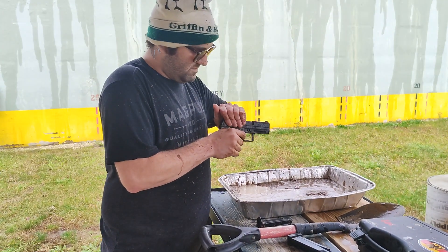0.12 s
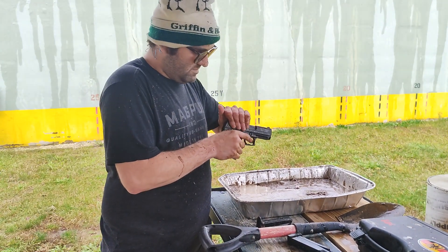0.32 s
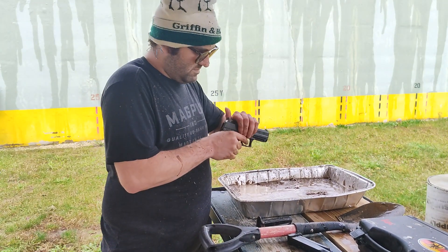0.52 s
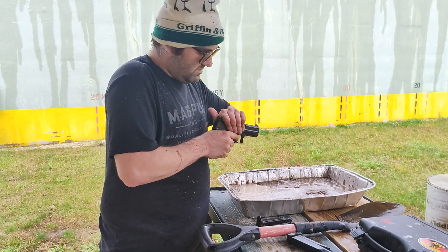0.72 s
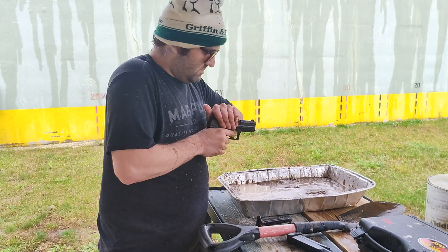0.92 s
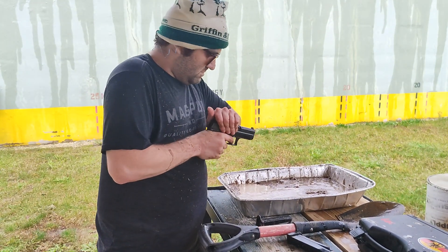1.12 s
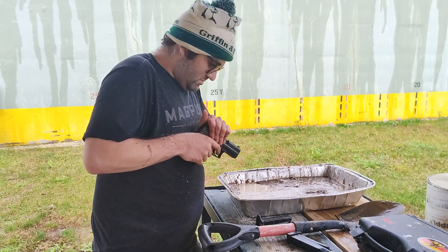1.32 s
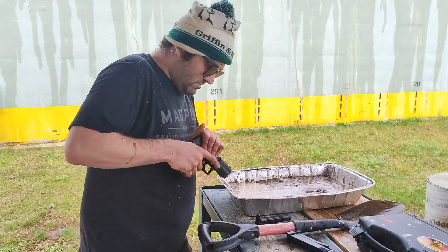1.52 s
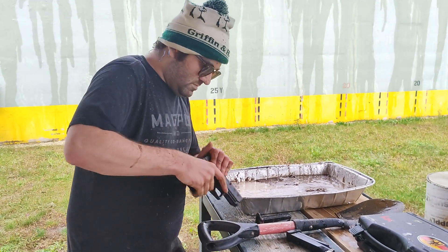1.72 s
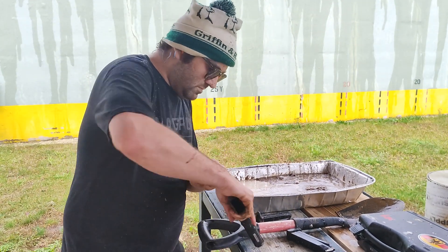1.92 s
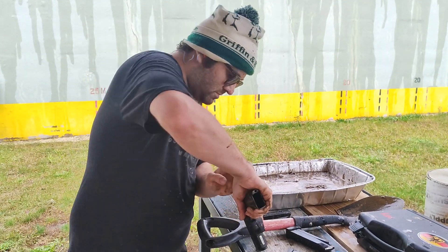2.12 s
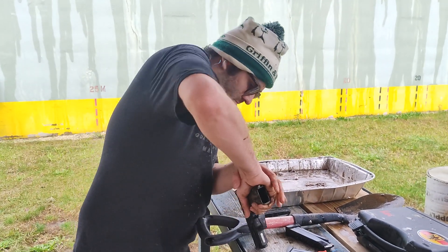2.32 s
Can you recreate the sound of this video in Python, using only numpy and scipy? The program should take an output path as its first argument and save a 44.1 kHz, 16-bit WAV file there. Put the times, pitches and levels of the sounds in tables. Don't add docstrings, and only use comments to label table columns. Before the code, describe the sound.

Close outdoor stereo pickup of a jammed pistol slide: tiny clicks, one loud bright clack early, fading metal rattles, quiet handling with cloth rub, a bird trill, then soft knocks of the muzzle on a light table.

```python
import sys
import numpy as np
from scipy import signal
from scipy.io import wavfile
from scipy.ndimage import uniform_filter1d

SR = 44100
rng = np.random.default_rng(int(sys.argv[2]) if len(sys.argv) > 2 else 0)


def digitize_waveform(pressure):
    field = np.atleast_2d(pressure).T
    bounded = np.clip(field, -1, 1)
    quanta = np.round(bounded * 32767).astype(np.int16)
    wavfile.write(sys.argv[1], SR, quanta)


def ratio(d):
    e = np.asarray(d, float) / 20
    return 10 ** e


N = 105840

# [t/s, level/dB]
BREEZE_LEVEL = [(0, -52.5), (.4, -53), (.75, -60.5), (1.3, -63), (1.5, -62.5), (2, -66.5), (2.4, -50)]
# [f/Hz, level/dB]
BREEZE_COLOUR = [(20, -28), (45, -2), (80, 9.5), (130, 4), (220, -11.5), (400, -44)]
# [t/s, level/dB, f/Hz]
WIND_PUFFS = [(0.051, -35, 96), (0.111, -45, 58.6), (.142, -38, 69.4), (0.302, -42.5, 68.5),
              (0.453, -34.5, 126), (0.469, -32.5, 101), (0.503, -35, 85), (0.611, -40, 97),
              (0.688, -36.5, 78), (0.739, -50, 121), (0.791, -53, 73.5), (1.096, -39.5, 85),
              (1.152, -38, 86), (1.176, -33.5, 73.2), (1.22, -38, 60.6), (1.271, -39, 82.6),
              (1.328, -41.5, 62), (1.377, -48, 86.7)]
# [f/Hz, level per Hz/dB]
FIELD_COLOUR = [(60, -42.5), (150, -1), (450, -12), (700, -3), (1100, -5.5), (2500, -2), (6500, -12.5),
                (16400, -46.5)]
# [t/s, level/dB]
FIELD_LEVEL = [(0, -52.5), (.5, -54.5), (1, -56.5), (1.5, -58.5), (2.1, -59.5), (2.4, -56.5)]
# [f/Hz, likeness (1 = the same)]
FIELD_LIKENESS = [(100, 1), (300, 0.76), (700, 0.39), (1400, 0.008)]
# [t/s, level/dB]
CLOTH_LEVEL = [(0, -107), (.09, -75), (.12, -71.5), (.5, -71.5), (.62, -67), (.68, -73), (.82, -68),
               (.87, -71), (.92, -66.5), (1.05, -76), (1.65, -76.5), (1.8, -70.5), (1.95, -67.5),
               (2.25, -74), (2.4, -64)]
# [f/Hz, level/dB]
CLOTH_COLOUR = [(2500, -17.5), (6000, 9.5), (9500, 1.5), (12500, 4), (16400, -4.5)]
# [t/s, peak
# level/dB, left-right/dB, loudest ring f/Hz, chatter/s]
CONTACTS = [(.103, -49, 5, 1470, .013), (0.179, -39, 5.5, 4300, 0.011), (.203, -27.5, -4, 6900, 0.0015),
            (.2045, -29, 0, 3440, 0.003), (.213, -36, -2.5, 4730, 0.018), (.2375, -8.5, -7.5, 3020, 0.002),
            (.2411, -1.5, 2.5, 3570, 0.0023), (.2427, -1.5, 3, 7820, 0.00046), (.2441, -2, -8, 7960, 0.001),
            (.2466, -9, 3, 3080, 0.0018), (.2555, -17, 10, 5900, 0.0016), (.265, -20, -4.5, 3140, 0.0038),
            (0.272, -23.5, -5.5, 4580, 0.021), (0.284, -36, -19, 2980, 0.019), (.315, -26, -2.5, 4300, .004),
            (.36, -34, -4.5, 2400, 0.0066), (.389, -34.5, 0.5, 2980, 0.013), (.408, -37, -10.5, 2200, 0.0085),
            (.423, -29.5, 4, 1800, 0.0023), (.428, -34, 5.5, 7000, .004), (.479, -43, 2, 2280, 0.0078),
            (0.698, -50.5, -1, 7430, 0.024), (0.8867, -47, -6, 7170, 0.043), (1.1923, -35, 1, 7130, 0.0025),
        (1.191, -48, -4, 5700, 0.0025), (1.2859, -29, 5, 7360, 0.00096),
        (1.2881, -31.5, 11.5, 4430, 0.0026), (1.291, -37, 10, 4700, .003), (1.298, -44, -17, 2100, 0.0053),
        (1.3673, -43.5, -3, 7100, 0.0024), (1.4566, -42.5, -0.5, 14040, 0.0063),
        (1.569, -55.5, -21, 11700, 0.0065), (1.583, -58, -8, 10230, 0.0034), (1.6614, -50, 5, 1068, 0.0068),
        (1.69, -56, -3, 6000, 0.0034), (1.81, -46.5, -2, 3740, 0.011), (2.116, -54, 0, 2100, 0.0037),
        (2.127, -45, -3, 1510, 0.0035), (2.235, -54, -11, 5500, 0.0018), (2.299, -49, -14, 2200, 0.018),
        (2.3066, -42, 3, 1150, 0.0044), (2.327, -48, 4, 2780, 0.0042), (2.3375, -33, 0.5, 5670, 0.0044),
        (2.35, -40, -1, 2960, 0.0051), (2.381, -44, 7, 4260, 0.0042), (2.394, -36, 5, 2560, 0.0052)]
# [f/Hz, level per Hz/dB]
CRACK_COLOUR = [(450, -41), (900, -23), (1150, -26.5), (1500, -13), (3000, -7), (7500, -11.5), (12000, -18),
                (16400, -24)]
# [f/Hz, level/dB, time to fall 60 dB/s]
SLIDE_MODES = [(1420, -2, .04), (2300, -6, .03), (2526, -4, .03), (2888, 0, .04), (3491, 0, .03),
               (4006, -3, .04), (4300, -3, .04), (5772, 0, .05), (7306, 2, .05), (7955, 0, .05),
               (8936, -2, .04), (11360, 2, .04), (12160, 2, .04)]
# [f/Hz, time to fall 60 dB/s]
NEAR_DECAY = [(500, 0.28), (2000, 0.13), (5000, 0.13), (14000, 0.061)]
# [f/Hz, time to fall 60 dB/s]
FAR_DECAY = [(500, 0.23), (2000, 0.71), (5000, 0.87), (14000, 0.31)]
# [t/s, peak level/dB, length/s,
# f/Hz, left-right/dB]
THRUMS = [(0.18, -56, 0.012, 990, 6), (0.203, -46.5, 0.0065, 970, 2), (0.241, -26.5, 0.017, 951, 6.5),
          (0.285, -40, 0.0144, 950, 0), (0.396, -45, 0.018, 978, 4), (0.436, -54.5, 0.0069, 985, 3),
          (1.286, -40.5, 0.01, 980, 8.5), (1.294, -50.5, 0.011, 987, 1), (1.329, -56.5, 0.009, 1000, 10),
          (2.344, -40.5, 0.0059, 2020, -9), (2.351, -49.5, .02, 2017, -8)]
# [t/s, length/s, level/dB, top f/Hz, climb/s]
BIRD_NOTES = [
    (.901, .056, -56, 7750, .036),
    (.964, .045, -53, 8050, .022),
    (1.036, .049, -51, 8050, .018),
    (1.13, .05, -53, 7880, .02),
    (2.108, .052, -53, 7800, .034),
    (2.17, .048, -52, 8030, .026),
    (2.25, .046, -52, 7960, .018),
]
# [t/s, level/dB, push/s]
KNOCKS = [
    (2.115, -39, 0.0021),
    (2.297, -50, .0038),
    (2.339, -38, 0.0025),
    (2.39, -64, .0044),
]
# [f/Hz, level/dB, time to fall 60 dB/s]
TABLE_MODES = [(85, -5, 0.2), (117.6, -9.5, 0.49), (175, -2, 0.31), (291, -21.5, 0.31), (490, -31, 0.058),
               (650, -4, 0.11)]
# [f/Hz, level/dB]
RATTLE_COLOUR = [(100, -8), (200, -7.5), (450, -19.5), (2000, -41)]
# [f/Hz, level/dB]
RIGHT_PORT_COLOUR = [(1000, 0), (2500, 1), (4500, -2), (8500, -1), (11500, 7), (16400, 11)]


def evened(x):
    return x / np.sqrt(np.mean(x ** 2) + 1e-20)


def read(points, hz):
    f, value = np.transpose(points)
    return np.interp(np.log(hz + 1), np.log(f + 1), value)


def level(points):
    s, db = np.transpose(points)
    return ratio(np.interp(np.arange(N) / SR, s, db))


def add(mix, s, sound):
    part = mix[..., round(s * SR):][..., :sound.shape[-1]]
    part += sound[..., :part.shape[-1]]


def sides(db, pan_db):
    return ratio(db + np.array([[pan_db / 2], [-pan_db / 2]]))


def colour(x, points):
    db = read(points, np.fft.rfftfreq(4096, 1 / SR))
    log = np.log(ratio(np.r_[db, db[-2:0:-1]]))
    taps = np.fft.ifft(np.exp(np.conj(signal.hilbert(log)))).real[:2048]
    return signal.oaconvolve(x, taps[None], axes=1)[:, :x.shape[1]]


def ring(t, hz, db, t60):
    return ratio(db - 60 * t / t60) * np.sin(2 * np.pi * hz * t)


def drift(width):
    smooth = uniform_filter1d(rng.standard_normal(N), int(width))
    return evened(uniform_filter1d(smooth, int(width)))


def echoes(x, decay):
    taps = np.zeros((2, SR))
    at = np.arange(100, SR - 20, 20) + rng.integers(0, 20, (2, (SR - 101) // 20))
    np.put_along_axis(taps, at, rng.choice([-1., 1.], at.shape), 1)
    hz, t, z = signal.stft(taps, SR, nperseg=128)
    fading = z * ratio(-60 * t / read(decay, hz)[:, None])
    tail = signal.istft(fading, SR, nperseg=128)[1]
    return signal.fftconvolve(x, tail / np.linalg.norm(tail[0]), axes=1)[:, :N]


def wind():
    lump_db, puff_cycles, puff_right_db = 4.5, 0.88, -40.5
    rumble = colour(rng.standard_normal((2, N)), BREEZE_COLOUR)
    lumps = ratio(lump_db * np.array([drift(1400), drift(810)]))
    rumble = evened(rumble * lumps) * level(BREEZE_LEVEL)
    puffs, t = np.zeros(N), np.arange(-3000, 3000) / SR
    for s, db, hz in WIND_PUFFS:
        lead = min(3000, round(s * SR))
        swing = np.cos(2 * np.pi * (hz * t + 0.87 * rng.random()))
        wave = ratio(db) * np.exp(-(t * hz / puff_cycles) ** 2) * swing
        add(puffs, s - lead / SR, wave[3000 - lead:])
    return rumble * ratio([[3], [-4]]) + puffs * ratio([[0], [puff_right_db]])


def field():
    patch_db, port_hz, port_width_hz, port_db = 1.9, 2053, 262, 14
    frames, hz = N // 256 + 5, np.fft.rfftfreq(1024, 1 / SR)
    a, b, c, d, patches = rng.standard_normal((frames, 513, 5)).T
    patches = uniform_filter1d(patches, 12, axis=0)
    patches = evened(uniform_filter1d(patches, 10, axis=1))
    same = np.clip(read(FIELD_LIKENESS, hz), -1, 1)[:, None]
    left = a + 1j * b
    right = same * left + np.sqrt(1 - same ** 2) * (c + 1j * d)
    z = np.array([left, right]) * ratio(read(FIELD_COLOUR, hz)[:, None] + patch_db * patches)
    port = ratio(port_db / (1 + (2 * (hz - port_hz) / port_width_hz) ** 2))
    z[1] *= port[:, None]
    wash = signal.istft(z, nperseg=1024, noverlap=768)[1][:, :N]
    return level(FIELD_LEVEL) * evened(wash)


def cloth():
    rubs_per_s, hiss, waver_db, spread_db = 3500, 0.33, 0.89, 0
    rubs = (rng.random((2, N)) < rubs_per_s / SR) * rng.standard_normal((2, N))
    rubs = rubs * ratio(spread_db * rng.exponential(1, (2, N)))
    rubs = colour(rubs + hiss * rng.standard_normal((2, N)), CLOTH_COLOUR)
    return level(CLOTH_LEVEL) * ratio(waver_db * drift(500)) * evened(rubs)


def slide():
    tilt_db = 0.54
    body_db, scatter_db, longest_s = -8, 4, .05
    own_db, own_s = -2, .02
    out, t = np.zeros((2, N)), np.arange(5000) / SR
    for s, db, pan_db, hz, chatter in CONTACTS:
        grit = rng.standard_normal((2, 5000)) * ratio(2.5 * rng.standard_normal((2, 5000)))
        grit = grit * np.minimum(t / (.25 * chatter), 1) * np.exp(-(t / chatter) ** 1.5)
        tilt = tilt_db * np.log2(hz / 3000)
        crack = colour(grit, [(f, d + tilt * np.log2(f / 3000)) for f, d in CRACK_COLOUR])
        body = np.zeros((2, 5000))
        scatter = scatter_db * rng.standard_normal((2, len(SLIDE_MODES)))
        for port in range(2):
            for (f, d, t60), change in zip(SLIDE_MODES, scatter[port]):
                body[port] += ring(t, f, d + change, min(t60, longest_s))
        own = ring(t, hz, 0, own_s * (1000 / hz) ** .7)[None]
        body_ring = signal.fftconvolve(crack, body, axes=1)[:, :5000]
        own_ring = signal.fftconvolve(crack, own, axes=1)[:, :5000]
        hit = evened(crack) + ratio(body_db) * evened(body_ring) + ratio(own_db) * evened(own_ring)
        add(out, s, sides(db, pan_db) * hit / abs(hit).max(1, keepdims=True))
    return out


def frame():
    skew, echo_db = .8, -15
    out = np.zeros((2, N))
    for s, db, length, hz, pan_db in THRUMS:
        t = np.arange(0, length, 1 / SR)
        swell = np.sin(np.pi * (t / length) ** skew)
        add(out, s, sides(db, pan_db) * swell * np.sin(2 * np.pi * hz * t))
    return out + ratio(echo_db) * echoes(out, NEAR_DECAY)


def bird():
    climb_hz, sag_hz, split_hz, waver_hz = 1000, 700, 840, 60
    flutter_db, voice_db, echo_db = 4, 5.5, -11
    out = np.zeros((2, N))
    for s, length, db, top_hz, climb_s in BIRD_NOTES:
        t = np.arange(round(length * SR)) / SR
        climb = 1 - (1 - np.minimum(t / climb_s, 1)) ** 2
        glide = top_hz - climb_hz * (1 - climb) - sag_hz * (t / length) ** 4
        shape = np.sin(np.pi * np.clip(t / length, 0, 1)) ** .75
        for k, part_db in [(-1, -12), (0, 0), (1, 0.5)]:
            waver, flutter = uniform_filter1d(rng.standard_normal((2, len(t))), 100, axis=1)
            hz = glide + k * split_hz + waver_hz * evened(waver)
            tone = np.sin(2 * np.pi * np.cumsum(hz) / SR) * ratio(flutter_db * evened(flutter))
            add(out, s, ratio(db + part_db + voice_db) * shape * tone * np.ones((2, 1)))
    swoop_at_s, swoop_s, swoop_db, from_hz, to_hz = .992, .026, -59, 7900, 5400
    t = np.arange(0, swoop_s, 1 / SR)
    hz = from_hz + (to_hz - from_hz) * t / swoop_s
    swoop = np.sin(np.pi * t / swoop_s) * np.sin(2 * np.pi * np.cumsum(hz) / SR)
    add(out, swoop_at_s, ratio(swoop_db) * swoop)
    return out + ratio(echo_db) * echoes(out, NEAR_DECAY)


def table():
    rattle_s = 0.032
    out, t = np.zeros(N), np.arange(SR // 2) / SR
    for s, db, push in KNOCKS:
        top = sum(ring(t, hz, d + 2 * rng.standard_normal(), t60) for hz, d, t60 in TABLE_MODES)
        force = (t / push * np.exp(-3 * t / push))[:1500]
        hum = signal.fftconvolve(top, force)[:len(t)] * (1 - np.exp(-t / .005))
        shake = rng.standard_normal((1, len(t))) * t / (t + push) * np.exp(-t / rattle_s)
        rattle = colour(shake, RATTLE_COLOUR)[0]
        add(out, s, ratio(db) * (hum / abs(hum).max() + rattle / abs(rattle).max()))
    return out


def scene():
    near_db, far_db, shared_hz = -6.5, -19, 1500
    steel = slide()
    steel = steel + ratio(near_db) * echoes(steel, NEAR_DECAY) + ratio(far_db) * echoes(steel, FAR_DECAY)
    bass = signal.filtfilt(*signal.butter(2, shared_hz, fs=SR), steel)
    steel = steel - bass + bass[0]
    return steel + frame() + table() + bird() + wind() + field() + cloth()


def band_limit(x):
    return signal.sosfilt(signal.butter(12, 16460, fs=SR, output="sos"), x)


def record(dry):
    lead_samples, edge_hz = 3, 16280
    left = np.roll(dry[0], -lead_samples)
    right = colour(dry[1:], RIGHT_PORT_COLOUR)[0]
    mix = np.tanh(np.array([left, right]))
    low_pass = signal.firwin(511, edge_hz, window=("kaiser", 10), fs=SR)
    mix = signal.oaconvolve(mix, low_pass[None], "same")
    return band_limit(mix)


dry = scene()
out = record(dry)
digitize_waveform(out)
```